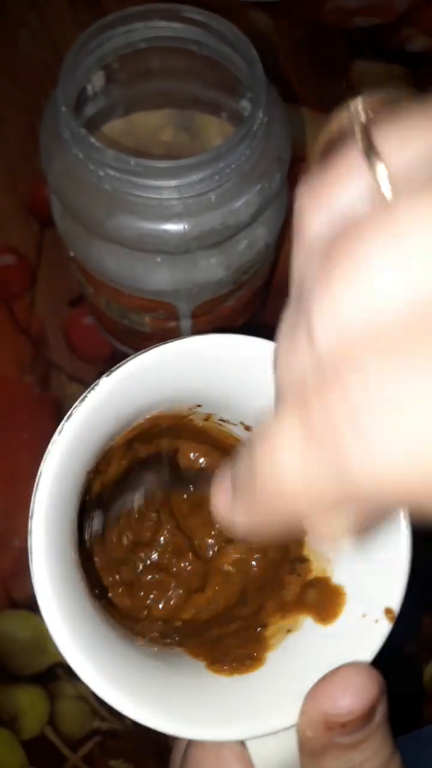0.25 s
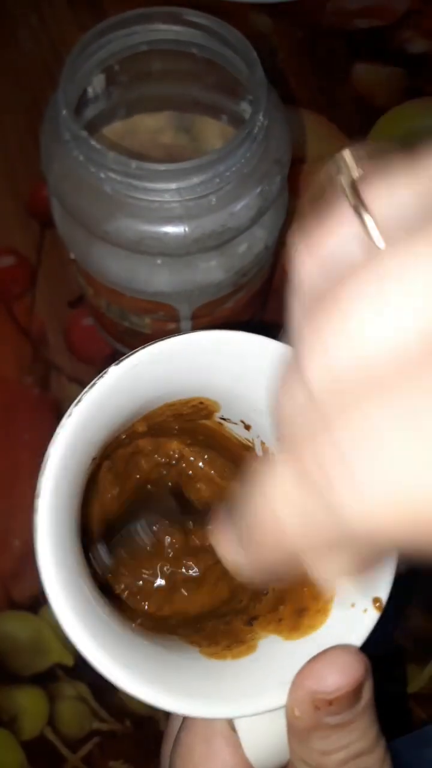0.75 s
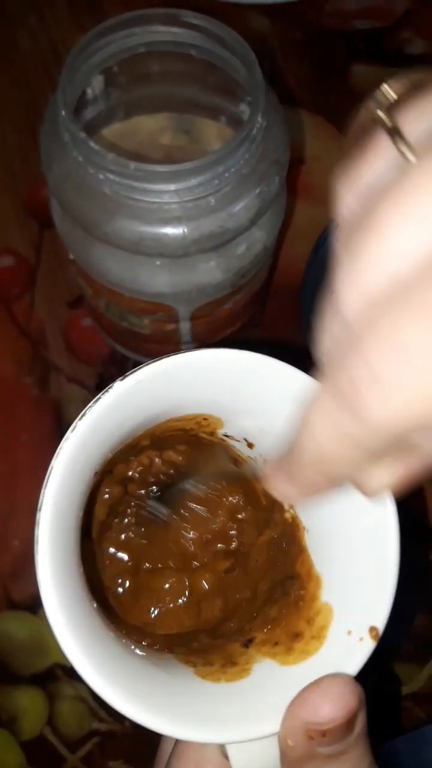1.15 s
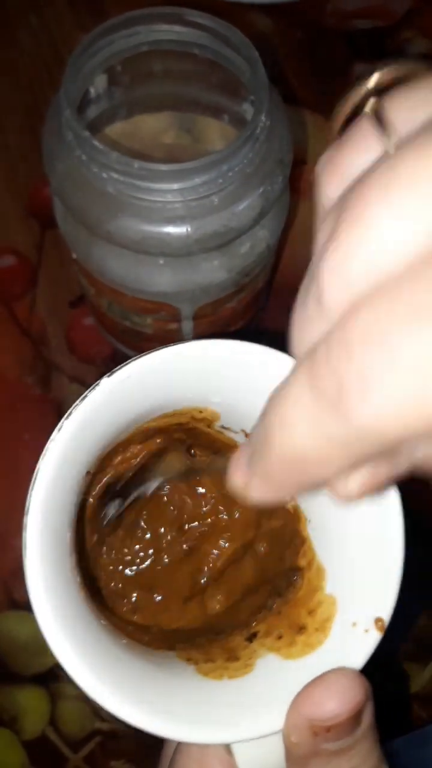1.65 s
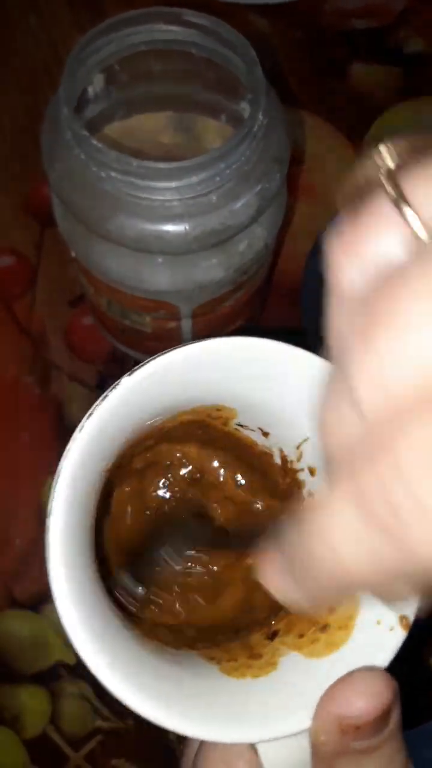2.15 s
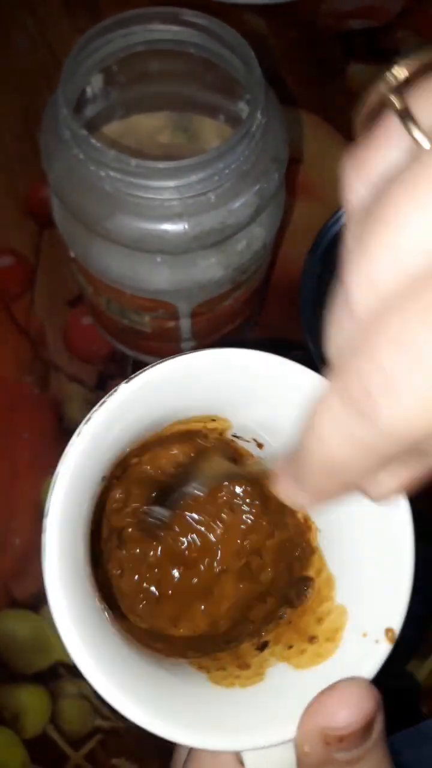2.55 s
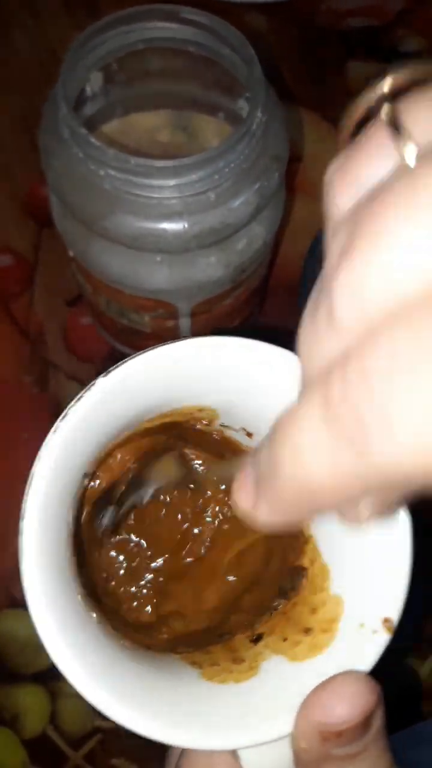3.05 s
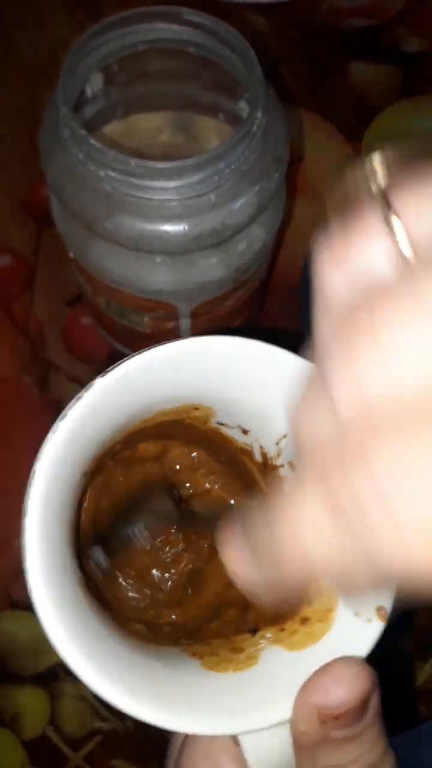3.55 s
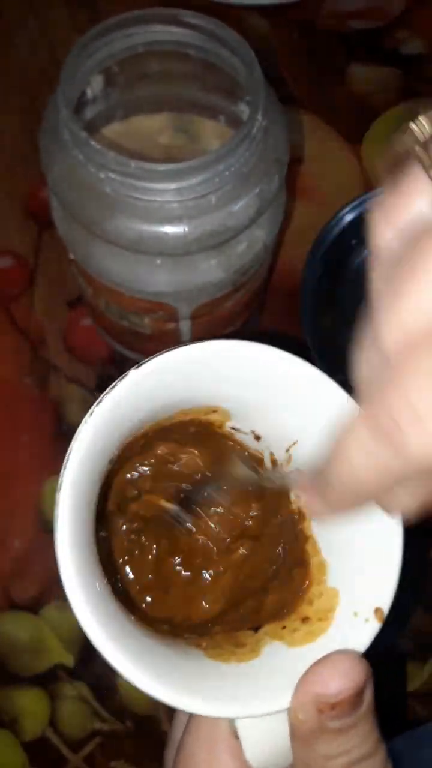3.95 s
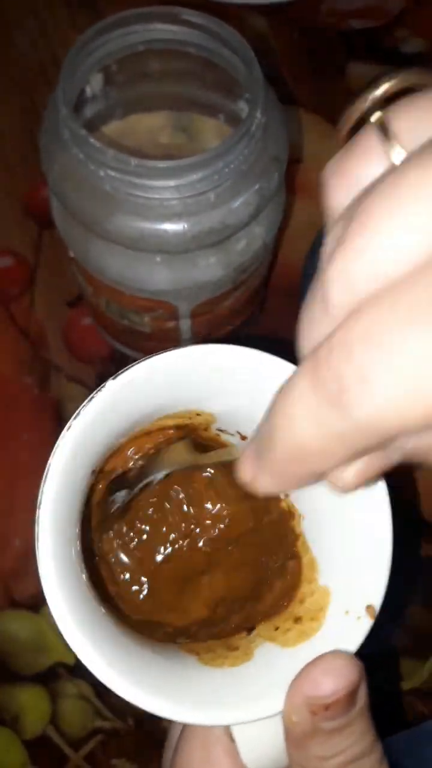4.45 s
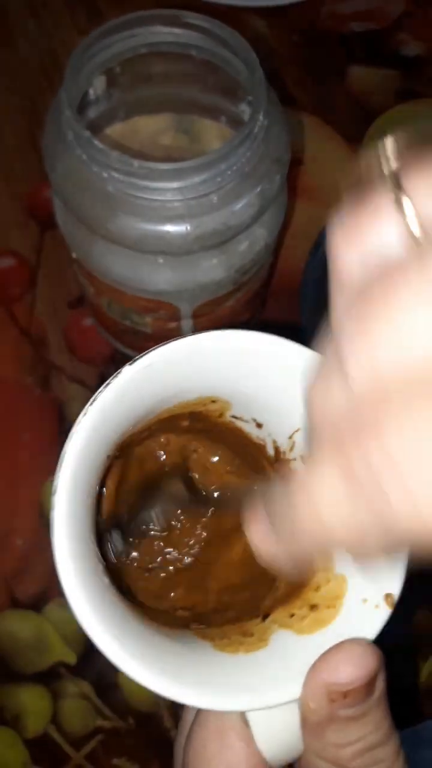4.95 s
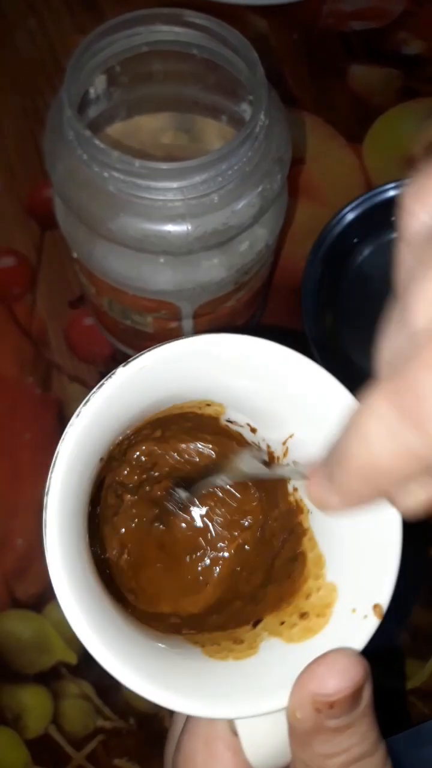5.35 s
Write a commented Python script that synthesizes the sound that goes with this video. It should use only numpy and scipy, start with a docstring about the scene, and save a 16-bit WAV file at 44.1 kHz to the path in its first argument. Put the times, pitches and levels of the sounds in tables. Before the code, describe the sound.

Very close to the microphone, a metal spoon beats thick sugary paste in a hand-held ceramic cup, about seven turns a second. Each turn brings a short gritty wet swish and one or more dry, quickly damped clinks of uneven strength. The slosh grows fuller as the paste loosens. A small, dry kitchen with faint low room noise; the stirring is under way from the start and runs to the end.

```python
"""A small kitchen: a metal spoon whips thick coffee paste in a hand-held ceramic cup, about seven turns a second.
Knocks on the wall are short noisy contact forces that excite damped modes of cup and spoon.
Between knocks, random grain impacts through the same modes make wet sugar swish and paste slosh, more as it loosens.
Hand and paste damp the cup, so it clinks only briefly. Low bumps, one fizzing peel, faint reflections
and a steady room background complete the scene."""
import sys
import numpy as np
from scipy import signal
from scipy.fft import rfft, irfft
from scipy.io import wavfile
from scipy.ndimage import uniform_filter1d

SR = 44100
rng = np.random.default_rng(int(sys.argv[2]) if len(sys.argv) > 2 else 0)


def transcribe(signal):
    """Save signal, clipped to [-1, 1], as a 16-bit WAV file at the path in sys.argv[1]."""
    frames = np.atleast_2d(signal).T
    limited = np.clip(frames, -1, 1)
    pcm = np.round(limited * 32767).astype(np.int16)
    wavfile.write(sys.argv[1], SR, pcm)


N = 247749

# modes of the hollow of the cup: pitch_hz, relative_level_db, t60_s
HOLLOW = [(408, -13.5, 0.016), (653, -15, 0.014), (895, -1, 0.025), (994.5, -1.5, 0.027), (1325, 5, 0.0054)]
# modes of the ringing wall: pitch_hz, relative_level_db, t60_s
RING = [(2300, 5, 0.0075), (2459, 1.5, 0.03), (2572, -3.5, 0.029)]
# modes of the wall's clack: pitch_hz, relative_level_db, t60_s
CLACK = [(3403, 8, 0.0043), (3710, 12, 0.004), (4527, 0.5, 0.011), (5410, -5, 0.0042), (6600, -6, 0.012),
         (6914, -5.5, 0.022)]
# modes of the spoon: pitch_hz, relative_level_db, t60_s
SPOON = [(7950, -10, 0.025), (8680, 11, 0.0048), (9133, 12.5, 0.013), (9440, 5, 0.013)]
# modes of the glaze's tick: pitch_hz, relative_level_db, t60_s
TICK = [(12740, -10, 0.004), (13900, -23, 0.0028), (16600, -10, .005)]
MODE_SETS = (HOLLOW, RING, CLACK, SPOON, TICK)  # per-part settings follow this order


def amp(db):
    """Decibels to gain."""
    return 10 ** (np.asarray(db) / 20)


def evened(x):
    """Scales to an rms of one."""
    return x / np.sqrt(np.mean(x ** 2) + 1e-20)


def read(points, hz):
    """Interpolates a table on a log-frequency axis."""
    point_hz, value = np.transpose(points)
    return np.interp(np.log(hz + 1), np.log(point_hz), value)


def add(mix, start_s, sound):
    """Mixes a sound in at a time."""
    span = mix[max(round(start_s * SR), 0):][:len(sound)]
    span += sound[:len(span)]


def bandpassed(x, low_hz, high_hz, order):
    """Butterworth band-pass."""
    sos = signal.butter(order, [low_hz, high_hz], "bandpass", fs=SR, output="sos")
    return signal.sosfilt(sos, x)


def quiet(level_db):
    """Low steady background of the room: noise shaped in frequency."""
    # background spectrum: pitch_hz, relative_density_db_per_hz
    spectrum = [(25, -18), (50, -16.5), (80, 0), (110, -1.5), (170, 3), (230, -10), (340, -8), (600, -18),
                (2000, -44), (8000, -23), (16000, -34)]
    hz = np.fft.rfftfreq(N, 1 / SR)
    shaped = rfft(rng.standard_normal(N)) * amp(read(spectrum, hz))
    return amp(level_db) * evened(irfft(shaped, N))


def grains(per_s, spread_db):
    """Random tiny impacts, most small and a few large."""
    size = amp(spread_db * np.minimum(rng.exponential(1, N), 4))
    sign = rng.choice([-1, 1], N)
    present = rng.random(N) < per_s / SR
    return evened(size * sign * present)


def rumble(level_db, low_hz, high_hz):
    """Dull bumps of the cup in the hand: band-passed impacts whose level follows the hand and the loosening paste."""
    # bump level over time: time_s, relative_level_db
    bump_level = [(0.0, -72), (0.23, -63.5), (3.55, -59), (4.24, -52.5), (5.62, -59.5)]
    bumps = evened(bandpassed(grains(per_s=1600, spread_db=4), low_hz, high_hz, order=2))
    relative_db = np.interp(np.arange(N) / SR, *np.transpose(bump_level))
    return bumps * amp(level_db + relative_db)


def ringing(part, spread_db, wander, freedom=1):
    """Answer of one mode set to a tap: contact place varies mode weights; well-damped modes wander most in pitch."""
    # edges of the ranges in which the five mode sets radiate: edge_hz
    range_edges = [220, 1950, 2780, 7150, 10200, 15900]
    hz, db, t60_s = np.transpose(MODE_SETS[part])[:, :, None]
    t = np.arange(SR // 12) / SR
    weight, shift = rng.standard_normal((2, len(hz), 1))
    pitch_hz = hz + wander * shift / t60_s
    # freedom above 1: longer ring, longest-lived modes take over
    height = amp(db + spread_db * weight) * (t60_s / t60_s.max()) ** (freedom - 1)
    decay = amp(-60 * t / (t60_s * freedom))
    modes = height * decay * np.cos(2 * np.pi * pitch_hz * t)
    low_hz, high_hz = np.clip(range_edges[part:part + 2], 20, SR / 2 - 100)
    return bandpassed(modes.sum(0), low_hz, high_hz, order=3)


def drags(part_db, pop_share, judder_db, stir_db, stir_follow, ease_db):
    """Fine wet sugar swishes between spoon and glaze while air pockets in the paste pop; each drag has its own colour."""
    # drags, about one a turn: peak_s, half_length_s, pressure_db (before part and loosening offsets)
    strokes = [(0.115, 0.012, -46), (0.246, 0.019, -50.5), (0.375, 0.015, -42), (0.519, 0.016, -43),
               (0.625, 0.032, -52), (0.91, 0.016, -42), (1.07, 0.015, -46.5), (1.201, 0.016, -42.5),
               (1.333, 0.022, -56), (1.473, 0.02, -52), (1.593, 0.026, -43.5), (1.755, 0.026, -44.5),
               (1.887, 0.019, -43), (2.044, 0.013, -46.5), (2.204, 0.039, -52.5), (2.361, 0.028, -49),
               (2.448, 0.017, -42.5), (2.579, 0.02, -48.5), (2.73, 0.015, -39.5), (2.871, 0.012, -46),
               (2.989, 0.026, -56), (3.156, 0.014, -39.5), (3.277, 0.026, -50.5), (3.434, 0.015, -38.5),
               (3.562, 0.017, -42), (3.694, 0.02, -41), (3.847, 0.026, -44), (3.994, 0.032, -47.5),
               (4.126, 0.023, -43.5), (4.26, 0.031, -44), (4.398, 0.014, -39.5), (4.536, 0.036, -44.5),
               (4.695, 0.039, -45.5), (4.823, 0.017, -32), (4.962, 0.025, -41.5), (5.091, 0.028, -43.5),
               (5.223, 0.034, -43), (5.338, 0.02, -39), (5.524, 0.031, -51.5), (5.608, 0.035, -66)]
    # brief hushes in the churning under the drags: center_s, half_length_s
    hushes = [(0.045, 0.012), (0.283, 0.0065), (0.837, 0.02), (1.046, 0.0089), (1.545, 0.011),
              (4.84, 0.051), (5.462, 0.05)]
    # soft churning under the drags, slowly swelling and fading: time_s, level_db (before the part's follow factor)
    churn = [(0.0, -47), (0.36, -49), (0.86, -50), (1.33, -48), (1.84, -50), (1.94, -45), (2.38, -46.5),
             (3.91, -45), (3.99, -45.5), (5.19, -47.5), (5.33, -51), (5.62, -53)]
    t = np.arange(N) / SR
    judder = amp(judder_db * evened(uniform_filter1d(rng.standard_normal(N), size=330)))
    churn_gate = np.prod([1 - 0.9 * np.exp(-((t - s) / half_s) ** 2) for s, half_s in hushes], axis=0)
    churn_db = np.interp(t, *np.transpose(churn))
    stroke_phase = np.interp(t, [stroke[0] for stroke in strokes], np.arange(len(strokes)))
    halfway = np.sin(np.pi * stroke_phase) ** 2  # 1 midway between drags
    out = np.zeros(N)
    for part, share in enumerate(pop_share):
        sugar = evened(grains(per_s=16000, spread_db=2) * judder)
        pops = grains(per_s=300, spread_db=8.0)
        drive = evened(sugar + share * pops)
        lead_s, stretch, loosen_db_per_s = 0, 1, 0
        if MODE_SETS[part] is HOLLOW:  # slosh leads the spoon, lasts longer and grows as the paste loosens
            lead_s, stretch, loosen_db_per_s = 0.0032, 1.26, 0.29
        for peak_s, half_s, pressure_db in strokes:
            peak_s, half_s = peak_s - lead_s, half_s * stretch
            start, stop = np.searchsorted(t, [peak_s - np.pi * half_s, peak_s + np.pi * half_s])
            level = amp(pressure_db + part_db[part] + loosen_db_per_s * peak_s)
            swell = level * np.exp(-((t[start:stop] - peak_s) / half_s) ** 2 / 2)
            body = ringing(part, spread_db=3, wander=0.45)
            swish = signal.fftconvolve(drive[start:stop] * swell, body / np.linalg.norm(body))
            add(out, start / SR, swish)
        # soft churning continues between drags
        churning = signal.oaconvolve(drive * churn_gate, ringing(part, spread_db=0, wander=0))[:N]
        churning_level = amp(stir_follow[part] * churn_db + ease_db[part] * halfway)
        out += amp(stir_db[part]) * evened(churning * churning_level)
    return out


def contact(chatter_s, push):
    """Force of a knock: a rounded push plus brief chatter as sugar is crushed under the spoon."""
    u = np.arange(SR // 200) / SR / chatter_s
    grit = u ** 2 * np.exp(-u) * rng.standard_normal(len(u))
    press = u * np.exp(-3 * u)
    return push * press / np.linalg.norm(press) + grit / np.linalg.norm(grit)


def knock(strength_db, thud_db, hardness_db, tick_db, part_db, bare_db, bare_gain):
    """One knock: strength drives the ring, paste adds thud, a hard contact brings out clack and spoon."""
    # paste under the spoon: longer, rounder contact
    force = contact(chatter_s=0.0003 * amp(0.04 * thud_db), push=0.33 * amp(0.17 * thud_db))
    # bare glaze: little thud, spoon springs clear, wall rings freely
    bare = np.clip(-thud_db / bare_db, 0, 1) ** 2
    shares_db = (thud_db, 0, 0.76 * hardness_db, 1.05 * hardness_db, tick_db)
    out = 0
    for part, share_db in enumerate(shares_db):
        freedom = 1 + bare_gain * bare * (MODE_SETS[part] is RING)
        sound = signal.fftconvolve(force, ringing(part, spread_db=4.5, wander=0.42, freedom=freedom))
        first_10ms_rms = np.sqrt(np.mean(sound[:SR // 100] ** 2))
        out = out + sound / first_10ms_rms * amp(strength_db + share_db + part_db[part])
    return out


def knocks():
    """Every knock of the spoon on the wall, each with its own force and modal answer."""
    # knocks: start_s, strength_db, then relative to the wall's ring, before part
    # offsets: hollow_thud_db, contact_hardness_db (before part factors), glaze_tick_db
    blows = [(0.074, -33, -3, -6.5, -9), (0.199, -37, 7.5, -4, -18), (0.337, -31.5, -0.5, -5, -11),
             (0.4536, -36, 2.5, 4, -12), (0.497, -25.5, -9, 2, -13), (0.4993, -21, -8.5, -4.5, -23),
             (0.5895, -26.5, -5.5, -5, -24), (0.7322, -38.5, 5.5, -15, -31), (0.869, -22.5, -6, -5, -8),
             (1.0833, -38.5, 9, -1.5, -18), (1.1457, -35, 1.5, -1, -13), (1.2787, -39.5, 3, -13, -27),
             (1.2876, -32.5, 2, -7.5, -15), (1.3578, -35, 6, 0.5, -15), (1.4198, -45, 1, 11, 8),
             (1.4241, -32.5, -0.5, 0.5, -20), (1.5529, -41.5, 9.5, 12.5, -1), (1.5605, -35, 2, -1, -18),
             (1.572, -20, -11.5, -13, -36), (1.6278, -40.5, 9, 5.5, -13), (1.709, -19.5, -5.5, -3, -14),
             (1.8524, -37.5, 0, -13, -17), (1.8624, -35.5, -3, -19, -27), (1.875, -25, -11.5, -2.5, -19),
             (1.9073, -52, 13, 16.5, 8), (2.034, -31.5, -20, -25.5, -28), (2.131, -46, 1, 1, -8),
             (2.1808, -34, 2.5, 17, -1), (2.184, -27, -12, -6, -25), (2.264, -32, 2.5, -5.5, -28),
             (2.279, -44, 4, 7, -1), (2.2917, -43, 6, -1, -13), (2.332, -21.5, -5.5, -1, -24),
             (2.4277, -26, -10, -9.5, -30), (2.5291, -44.5, 13.5, 5.5, -8), (2.562, -27.5, -1.5, -3, -13),
             (2.6763, -25.5, 2.5, -10, -14), (2.69, -42.5, 11, 11.5, -2), (2.8242, -36, 7.5, -4.5, -24),
             (2.841, -29, -1, -4, -10), (2.953, -34.5, 8, -12, -26), (3.1042, -38, 11, -2, -2),
             (3.1181, -26.5, -3.5, -1, -11), (3.245, -44, 9.5, 5, -2), (3.3135, -49.5, 14.5, -15, -19),
             (3.3851, -30, 2, -0.5, -10), (3.5102, -46.5, 14.5, -8, -16), (3.553, -35, 6, -0.5, -16),
             (3.6528, -45.5, 14.5, 16.5, 9), (3.6731, -21.5, -4, -4.5, -9), (3.8298, -38, 6.5, -1, -7),
             (3.8372, -33, 9.5, 4, -8), (3.928, -35.5, 6.5, -11, -34), (3.9841, -30.5, -18, 1, -14),
             (3.9932, -25.5, -9, -2.5, -32), (4, -28.5, -4, -5.5, -23), (4.066, -29, 6, -9.5, -25),
             (4.075, -46.5, -10, 13, 4), (4.1135, -41.5, 2, 6.5, -9), (4.169, -44.5, 8.5, 4.5, 0),
             (4.21, -29, 0, 2, -8), (4.2226, -36, 5, -6, -20), (4.346, -36.5, 4.5, -4, -18),
             (4.3582, -32.5, -0.5, -5.5, -19), (4.4885, -38, 3, -5, -12), (4.5051, -28, 0.5, -2.5, -17),
             (4.618, -31.5, 3, -6.5, -17), (4.672, -37.5, 5, -5, -11), (4.686, -35.5, 5, -5.5, -20),
             (4.763, -39.5, 6, 2.5, -19), (4.779, -27, 3, 0.5, -10), (4.9154, -26.5, -3, 1.5, -19),
             (4.955, -31, 5, 1.5, -13), (5.0375, -45.5, 14.5, 11, 4), (5.0464, -34, 1, -7, -19),
             (5.1801, -38, 5.5, 6, -11), (5.3081, -35, 5.5, -2, -23), (5.328, -27, -1, -2.5, -13),
             (5.459, -30, -10, -7, 0.5), (5.546, -52, -1, 10.5, 1)]
    out = np.zeros(N)
    for start_s, *blow in blows:
        add(out, start_s, knock(*blow, part_db=[-0.17, 0.22, -1.24, -1.97, 0.3], bare_db=14.5, bare_gain=1.0))
    return out


def peel(start_s, level_db, fade_s, center_hz):
    """Spoon peels out of the paste clear of the wall: a soft fizz of tiny bubbles, exciting no cup modes."""
    t = np.arange(SR // 4) / SR
    bubbles = grains(per_s=11000, spread_db=5)[:len(t)]
    fizz = evened(bandpassed(bubbles, center_hz / np.sqrt(2), center_hz * np.sqrt(2), order=2))
    out = np.zeros(N)
    add(out, start_s, amp(level_db) * fizz * np.exp(-t / fade_s))
    return out


def kitchen(x, gap_s, early_db, early_s):
    """Dense reflections, strongest from the near table and walls, each band dying at its own speed."""
    # reverberation: pitch_hz, t60_s
    decay_times = [(200, 0.45), (1000, 0.072), (3000, 0.064), (9000, 0.032), (16000, 0.062)]
    t = np.arange(SR // 2) / SR
    taps = rng.standard_normal(len(t)) * (rng.random(len(t)) < 0.1) * (t > gap_s)
    taps = taps * (1 + amp(early_db) * np.exp(-t / early_s))
    hz, at_s, bands = signal.stft(taps, SR, nperseg=128)
    decay = amp(-60 * at_s / read(decay_times, hz)[:, None])
    tail = signal.istft(bands * decay, SR, nperseg=128)[1]
    return signal.fftconvolve(x, tail / np.linalg.norm(tail))[:N]


def scene():
    """The cup close by, with the room behind it."""
    cup = drags(part_db=[-3.0, 0.5, 0.5, -3.5, -11.5], pop_share=[0.85, 0.24, 0.14, 0.12, 0.17],
                judder_db=3.5, stir_db=[-50.5, -56.5, -55, -61.5, -66.5],
                stir_follow=[1.6, 0.7, 0.29, 0.52, 0.78], ease_db=[0.0, 0, 0.5, -2.5, 0])
    cup = cup + rumble(level_db=2, low_hz=120, high_hz=380)
    cup = cup + knocks()
    cup = cup + peel(start_s=0.693, level_db=-39.5, fade_s=0.039, center_hz=4660)
    reflections = amp(-14.5) * kitchen(cup, gap_s=0.005, early_db=0, early_s=0.0073)
    return (cup + reflections + quiet(level_db=-56))[None]


def record(dry):
    """Causal (minimum-phase) colour of the microphone, soft overload of the hardest peaks, then the band limit."""
    # microphone response: pitch_hz, gain_db
    response = [(100, -9), (2600, 0.5), (2850, -4), (3300, -4), (7000, 3), (7400, -8), (8000, 2), (9500, 1),
                (10200, -12), (10650, -6), (11300, 3.5), (12500, -3), (15500, 4.5), (16500, -27)]
    size, edge_hz = 2048, 16500
    log_gain = np.log(amp(read(response, abs(np.fft.fftfreq(size, 1 / SR)))))
    colour = np.fft.ifft(np.exp(np.conj(signal.hilbert(log_gain)))).real
    heard = signal.oaconvolve(dry, colour[None, :size // 2])[:, :N]
    # high-passed excess: only fast peaks are rounded off, no thump added
    excess = heard - heard / (1 + (heard / 0.85) ** 8) ** (1 / 8)
    fast = signal.butter(2, 600, "highpass", fs=SR, output="sos")
    heard = heard - signal.sosfilt(fast, excess)
    band_limit = signal.firwin(401, edge_hz, window=("kaiser", 9), fs=SR)
    return signal.oaconvolve(heard, band_limit[None], "same")


dry = scene()
out = record(dry)
transcribe(out)
```